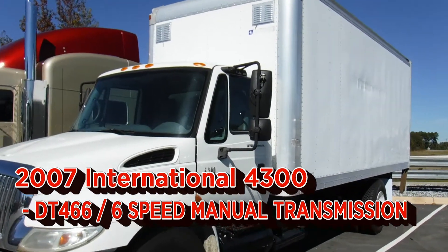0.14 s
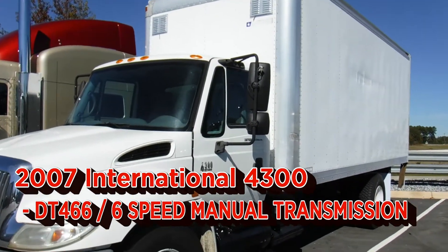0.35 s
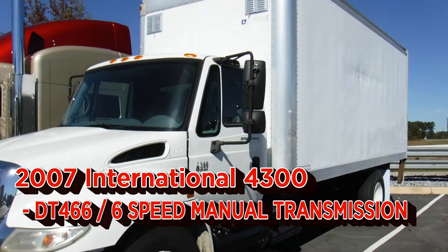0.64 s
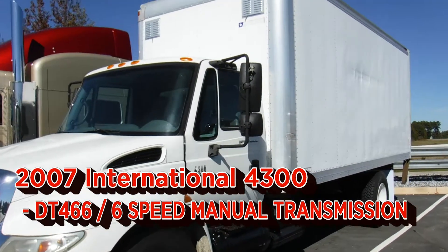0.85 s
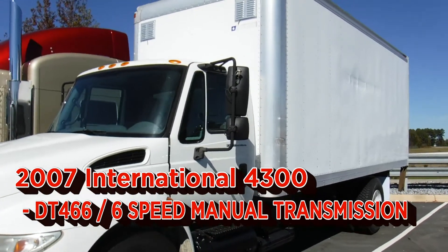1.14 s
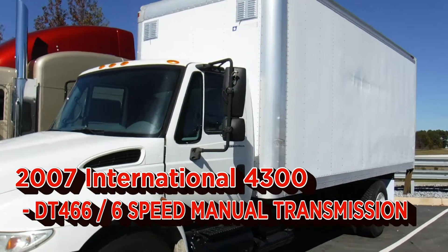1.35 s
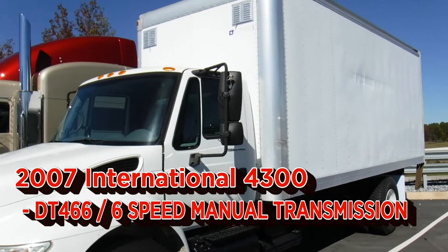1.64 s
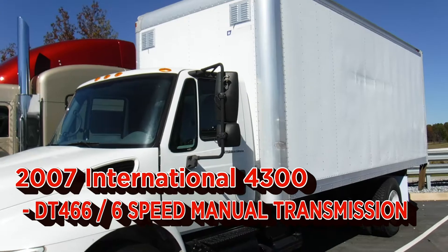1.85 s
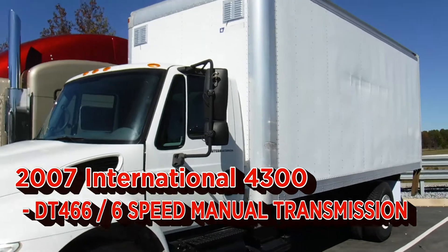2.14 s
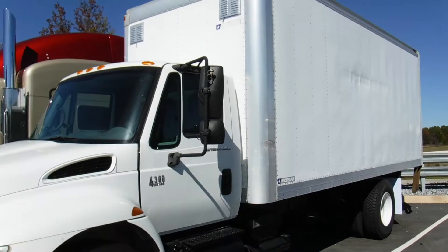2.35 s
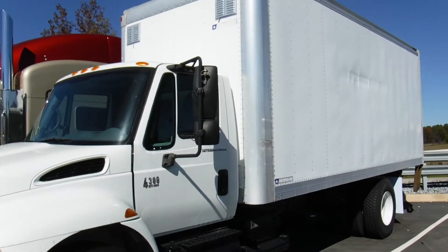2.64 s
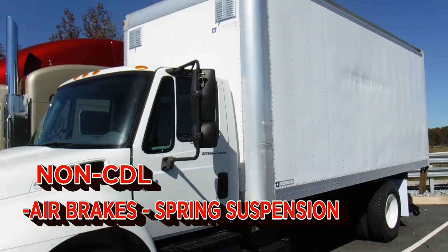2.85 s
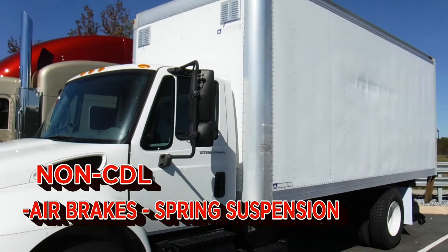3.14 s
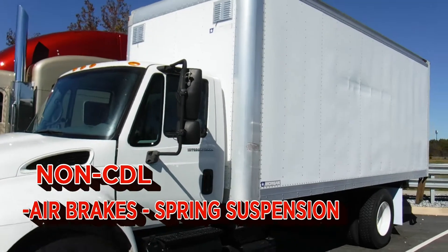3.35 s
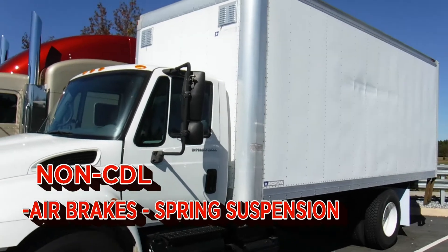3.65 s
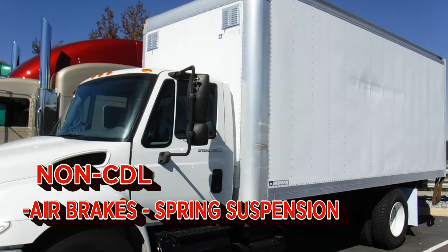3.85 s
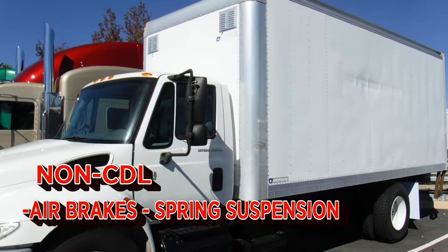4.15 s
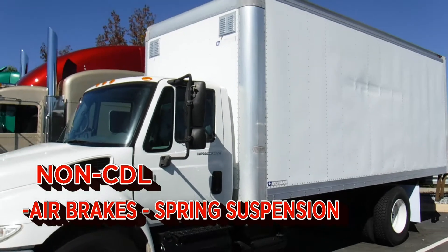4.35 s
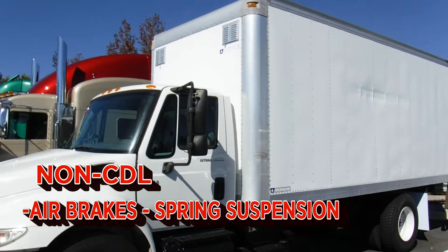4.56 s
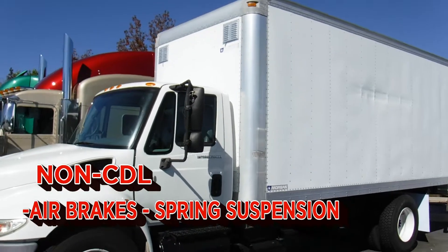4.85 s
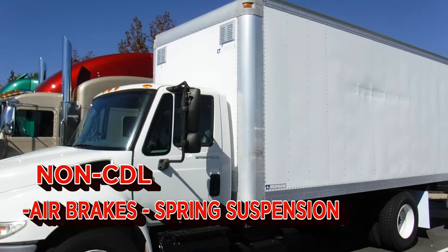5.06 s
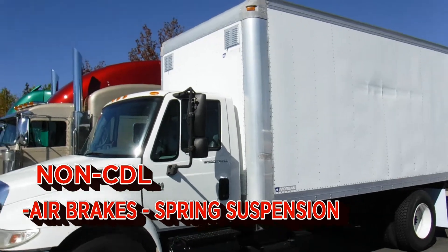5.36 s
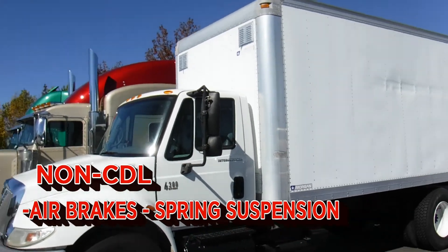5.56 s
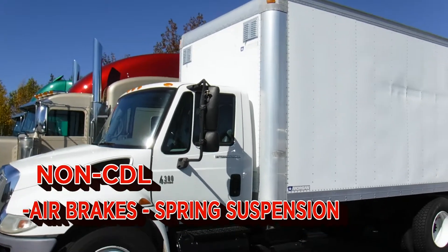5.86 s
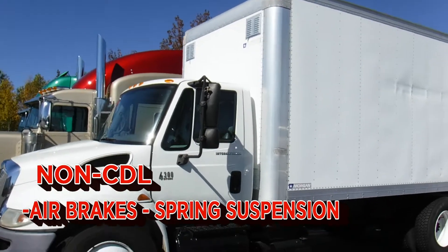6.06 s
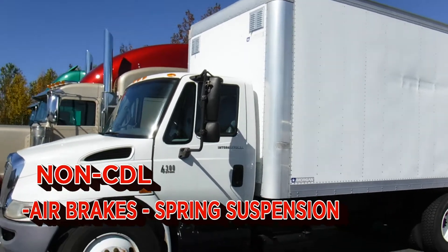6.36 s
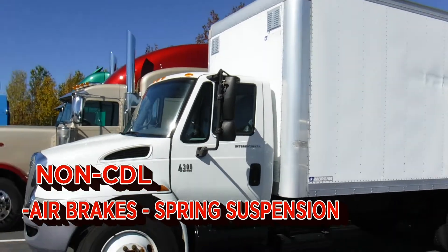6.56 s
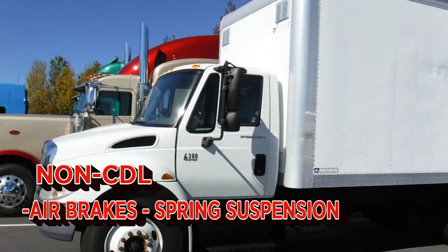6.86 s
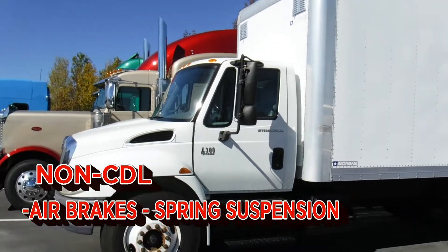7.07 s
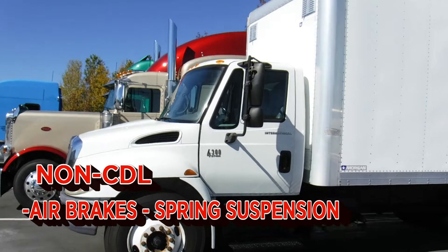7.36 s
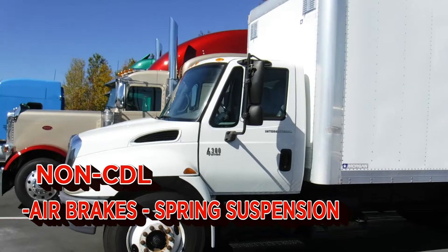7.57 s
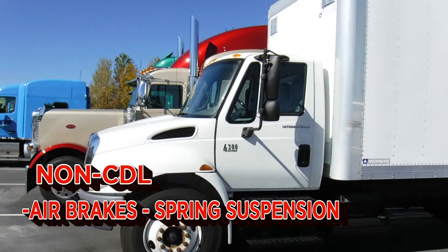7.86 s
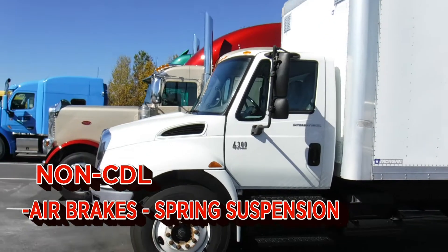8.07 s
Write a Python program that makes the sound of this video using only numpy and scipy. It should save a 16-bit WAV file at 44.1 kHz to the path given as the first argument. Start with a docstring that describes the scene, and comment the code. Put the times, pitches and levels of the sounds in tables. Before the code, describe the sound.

Steady rattling truck diesel idle in an open lot, wind bumping the microphone, interrupted midway by one sharp, overloading blast of released air.

```python
"""A six-cylinder diesel truck idles in an open lot while the microphone is carried from its nose to its side.
From the start each firing excites the block and rattles the injectors, shaped noise ringing in resonances; the
idle speed hunts gently. A belt sings in close sine tones early on, and gusts of filtered noise buffet the
microphone. Halfway through, an air valve dumps its pressure: a loud hiss of turbulent noise, its peaks clipped
flat, fades ever faster and leaves a diffuse echo, while the engine, now fainter, idles on in the wind."""
import sys
import numpy as np
from scipy import signal
from scipy.fft import rfft, irfft
from scipy.io import wavfile
from scipy.ndimage import uniform_filter1d

SR = 44100
rng = np.random.default_rng(int(sys.argv[2]) if len(sys.argv) > 2 else 0)


def waveform_to_disk(signal):
    """Save audio, clipped to [-1, 1], as 16-bit WAV at the path in sys.argv[1]."""
    frames = np.transpose(np.atleast_2d(signal))
    scaled = np.clip(frames, -1, 1) * 32767
    samples = np.round(scaled).astype(np.int16)
    wavfile.write(sys.argv[1], SR, samples)


N = 362061
TIME = np.arange(N) / SR
FREQS = np.maximum(np.arange(N // 2 + 1) * SR / N, 1)  # Hz, kept above zero for the logarithm

# hunting idle speed: time_s, firing_rate_hz
IDLE_SPEED = [(0, 34.85), (.35, 34.8), (1, 35.45), (1.85, 34.53), (2.95, 35.58), (3.5, 34.35),
              (3.95, 34.75), (4.3, 35.85), (4.75, 35.85), (5.25, 34.6), (5.6, 34.45), (6.2, 34.9),
              (6.7, 35.62), (7.6, 34.58), (8.21, 34.95)]
# cylinders in firing order, compared with one another: knock_db, rattle_db
CYLINDER_LEVELS = [(-2, 6.5), (-0.9, 7.5), (-0.1, 7), (0, 8.5), (-0.5, 7), (-0.4, 9.5)]
# broad spectrum of the combustion knock: frequency_hz, level_db
KNOCK_SPECTRUM = [(20, -57), (300, -27), (540, -11.5), (650, -5.5), (800, -2), (1200, 1), (1450, 1.5),
                  (1650, -2), (1850, -4), (2300, -16.5), (3500, -19.5), (7000, -61)]
# broad spectrum of the injector rattle: frequency_hz, level_db
RATTLE_SPECTRUM = [(1200, -12), (2100, -1), (2600, 2), (3100, -1), (3700, 1), (5400, 0), (5800, -0.5),
                   (6500, -10.5), (7200, -10), (8100, -11.5), (8900, -18.5), (11000, -29.5), (15500, -37)]
# broad spectrum of the low drone: frequency_hz, level_db
DRONE_SPECTRUM = [(15, -28), (24, -18), (35, -3.5), (70, -1.5), (115, -1), (160, -3.5), (210, -7),
                  (340, 4.5), (480, -7.5), (800, 7.5), (2000, -55)]
# block and panel resonances heard in front of the truck: centre_hz, width_hz, lift_db
NOSE_RESONANCES = [(115, 25, 6), (202, 60, 4.5), (339, 120, 4), (625, 33, 5), (908, 50, 8), (1080, 99, 2.5),
                   (1520, 360, 1), (2580, 110, 0.5), (4330, 120, -4.5), (4990, 90, -4), (6300, 120, -1),
                   (6800, 190, 9)]
# block and panel resonances heard beside the truck: centre_hz, width_hz, lift_db
SIDE_RESONANCES = [(116, 17, 9.5), (213, 25, 8.5), (460, 50, 0.5), (879, 45, 7), (1063, 30, 6),
                   (1555, 39, 6), (1820, 10, 8.5), (2480, 45, -4), (3525, 18, 9.5), (4170, 94, 2.5),
                   (4960, 37, -15), (6060, 58, 8.5), (6370, 150, 8.5)]
# parts that ring softly at every firing, relative to the rattle: centre_hz, width_hz, level_db
RINGING_PARTS = [(4250, 81, -27), (4780, 300, -17), (6280, 380, -14.5)]
# engine level on the way from nose to side: time_s, level_db
ENGINE_LEVELS = [(0, -26.5), (.8, -25.9), (1.7, -28.1), (2.7, -27.5), (3.9, -28.4), (5.1, -30), (6.4, -30),
                 (7.2, -31.5), (8.21, -31)]
# chattering injector and valve parts, relative to the knock: firing_place, pitch_hz, level_db
CHATTERING_PARTS = [(2, 4900, -15.5), (2, 6450, -18.5), (2, 4230, -19), (3, 6350, -19.5), (3, 4230, -19),
                    (5, 4260, -15.5), (5, 6500, -21.5)]
# firings with a set chatter force in place of a random one: time_s, extra_db
SET_CHATTER = [(.728, 1), (1.063, 6), (1.233, 6), (1.6, 5), (2.133, 8), (2.533, 8), (3.12, 1), (3.81, 2),
               (7.052, 4), (7.946, 3)]
# belt squeals: middle_s, half_length_s, pitch_hz, level_db
BELT_SQUEALS = [(0.343, 0.35, 3413, -40.5), (0.794, 0.047, 3425, -32), (0.973, .07, 3410, -34),
                (1.179, 0.0497, 3426, -32), (2.668, 0.047, 3500, -36.5), (2.8, 0.72, 3400, -40.5)]
# close tones of a squeal: offset_hz from its pitch, level_db
SQUEAL_TONES = [(-113, -1), (0, 0), (111, -15)]
# gusts of wind: middle_s, half_length_s, level_db
WIND_GUSTS = [(.6, .23, -38), (2.55, 0.49, -44.5), (3.25, 0.4, -34), (4.3, 0.25, -42), (4.853, .15, -50),
              (6.823, 0.23, -43.5), (7.95, 0.44, -50)]
# the hardest buffets on the microphone: middle_s, half_length_s, level_db
HARD_BUFFETS = [(.413, .03, -39.5), (0.704, 0.028, -34), (2.847, 0.018, -26), (2.936, .03, -31),
                (2.986, .01, -26), (3.318, 0.0057, -16), (3.348, 0.0084, -22), (3.383, 0.013, -19.5),
                (3.428, 0.015, -21), (3.464, 0.014, -24), (3.685, 0.03, -29), (4.257, 0.0065, -27),
                (4.422, 0.0053, -29), (4.503, 0.0075, -28), (4.788, .008, -34), (5.3, 0.025, -38.5),
                (6.846, 0.0099, -32.5), (6.972, .007, -36.5)]
# broad spectrum of the wind rumble: frequency_hz, level_db
BREEZE_SPECTRUM = [(15, -15), (24, -14), (36, -20), (80, 0), (120, 1), (220, 0), (350, -7), (600, -12),
                   (1500, -55)]
# broad spectrum of eddies and buffets: frequency_hz, level_db
BUFFET_SPECTRUM = [(30, -28), (90, -26), (180, -0.5), (340, -2), (600, -6.5), (1000, -11), (2500, -37),
                   (6000, -56)]
# broad spectrum of the jet at full pressure: frequency_hz, level_db
FULL_JET_SPECTRUM = [(100, -31), (250, -17), (500, -29), (1000, -34), (1500, -15.5), (2200, -15.5),
                     (3000, -12.5), (4200, -0.5), (5700, -1), (6400, 0), (7300, -6.5), (8400, -6),
                     (9500, -11), (12000, -14), (15500, -21)]
# broad spectrum of the jet at falling pressure: frequency_hz, level_db
WEAK_JET_SPECTRUM = [(500, -38), (2000, -12), (2450, -9.5), (2800, -5), (3400, -18), (4300, -10),
                     (5000, -13), (5900, 2), (6800, -8), (8300, -4), (9500, -11.5), (10500, -5.5),
                     (11500, -25), (15500, -25)]
# resonances of the valve's exhaust port: centre_hz, width_hz, lift_db
PORT_RESONANCES = [(2790, 130, 4.5), (3180, 120, 8.5), (4400, 170, -0.5), (5480, 400, 4.5), (6300, 170, 1),
                   (6970, 140, 4.5), (7750, 220, 5.5), (8440, 170, 1), (10130, 300, -5), (11200, 300, 2),
                   (14300, 400, 4)]
# broad spectrum of the hiss returning from the parked trucks: frequency_hz, level_db
ECHO_SPECTRUM = [(500, -21.5), (2300, -17), (2900, 0.5), (3600, -1), (6200, -5), (8000, -20), (11000, -28),
                 (15500, -35)]

FIRST_PHASE = .78  # part of a firing interval already elapsed at the start
KNOCK_RISE_S, KNOCK_RING_S = .0058, .019
BLOCK_DB, GEARS_DB = -25.5, -5  # relative to the knock, before the panels colour all three
RATTLE_DB, DRONE_DB = -.74, -13  # relative to the knock
CHATTER_LAG_S, CHATTER_RISE_S, CHATTER_DECAY_S = .003, .0035, .021
CHATTER_SCATTER_DB, CHATTER_Q = 1.5, 27
CALM_DB = -55  # wind between gusts
EDDY_DB, EDDY_SPREAD_DB = -15, 4.5  # small buffets relative to the wind, and their spread
VALVE_OPENS_S, VALVE_TRAVEL_S = 3.994, .033
FADE_DB_PER_S, FADE_DB_PER_S2 = 24.5, 40
WEAK_AFTER_DB, WEAK_SHARE = 16, .66  # fade at which the weak colour reaches its full share
DULL_FROM_DB, DULL_OVER_DB = 12, 23  # fade at which the top begins to go, further fade until it is gone
TOP_HZ = 15700


def undb(db):
    """Amplitude gain is ten to the power of decibels over twenty."""
    return 10 ** (np.asarray(db) / 20)


def unit(x):
    """Normalization: division by the root mean square gives unit rms."""
    return x / np.sqrt(np.mean(x ** 2))


def curve(rows):
    """Linear interpolation joins points (time_s, value)."""
    rows = np.array(rows)
    return np.interp(TIME, rows[:, 0], rows[:, 1])


def noise():
    """White noise: independent Gaussian samples of equal power at all frequencies."""
    return rng.standard_normal(N)


def walk(corner_hz):
    """Low-passed noise makes a smooth random wander of unit spread."""
    return unit(irfft(rfft(noise()) / (1 + (FREQS / corner_hz) ** 4), N))


def swell(middle_s, half_s, db):
    """Flat-topped envelope: a smooth rise, a short hold and a smooth fall."""
    return undb(db) / np.sqrt(1 + ((TIME - middle_s) / half_s) ** 8)


def colour(x, points, modes=()):
    """Minimum-phase filtering by a broad spectrum with resonances on top; unit rms."""
    hz, db = np.transpose(points)
    db = np.interp(np.log(FREQS), np.log(hz), db)
    for centre, width, lift in modes:
        db = db + lift / (1 + (2 * (FREQS - centre) / width) ** 2)
    # folding the cepstrum onto positive times makes the filter causal
    cepstrum = irfft(np.log(undb(db)), N)
    cepstrum[1:N // 2] *= 2
    cepstrum[N // 2:] = 0
    response = np.exp(rfft(cepstrum))
    return unit(irfft(rfft(x) * response, N))


def ring(x, hz, width_hz):
    """Simple resonance: a second-order peak filter, normalized to unit rms."""
    b, a = signal.iirpeak(hz, hz / width_hz, fs=SR)
    return unit(signal.lfilter(b, a, x))


def ring_twice(x, hz, width_hz):
    """Two equal resonances in cascade give steeper skirts and a rounded onset."""
    return ring(ring(x, hz, width_hz), hz, width_hz)


def reflect(x, decay_s, db):
    """Dense close reflections: convolution with decaying noise adds sound off the chassis and ground."""
    t = np.arange(SR // 10) / SR
    echoes = unit(rng.standard_normal(len(t)) * np.exp(-t / decay_s)) / np.sqrt(len(t))
    return x + undb(db) * signal.fftconvolve(x, echoes)[:N]


def firings():
    """Phase integration: a cylinder fires whenever the accumulated firing rate passes a whole number."""
    phase = FIRST_PHASE + np.cumsum(curve(IDLE_SPEED)) / SR
    return np.interp(np.arange(1, int(phase[-1]) + 1), phase, TIME)


def firing_cylinders(times):
    """Cyclic firing order: the cylinders take their turns one after another."""
    return np.arange(1, len(times) + 1) % len(CYLINDER_LEVELS)


def blows(times, cylinder_db, rise_s, decay_s, scatter_db, alike, jitter_s, ragged_db):
    """Repeated impact excitation: noise bursts at the firings, partly alike from cycle to cycle."""
    t = np.arange(SR // 10) / SR
    shape = (1 - np.exp(-(t / rise_s) ** 2)) * np.exp(-t / decay_s)
    own = rng.standard_normal((len(cylinder_db), len(t)))
    # pressure rise, piston slap and bearing play give each cylinder its own lumps
    lumps = undb(ragged_db * unit(uniform_filter1d(rng.standard_normal(own.shape), size=130)))
    memory = .95  # share of a cylinder's own burst power kept until its next firing
    out = np.zeros(N + SR)
    for start, c in zip(times, firing_cylinders(times)):
        drift, fresh = rng.standard_normal((2, len(t)))
        late, strong = rng.standard_normal(2)
        own[c] = np.sqrt(memory) * own[c] + np.sqrt(1 - memory) * drift
        grain = np.sqrt(alike) * own[c] + np.sqrt(1 - alike) * fresh
        burst = grain * unit(shape * lumps[c])
        i = max(int((start + jitter_s * late) * SR), 0)
        out[i:i + len(t)] += burst * undb(cylinder_db[c] + scatter_db * strong)
    return unit(out[:N])


def block_thumps(times, cylinder_db, hz, width_hz, lag_s):
    """Impulse response: each pressure peak strikes the main bending mode of the block."""
    sizes = undb(cylinder_db[firing_cylinders(times)])
    samples = ((times + lag_s) * SR).astype(int)
    pulses = np.bincount(samples, sizes, N)[:N]
    return ring_twice(pulses, hz, width_hz)


def panels(x, points):
    """Modal radiation: the resonances heard cross-fade on the way from the nose to the side."""
    side = curve([(2.6, .15), (5.2, 1)])
    return (1 - side) * colour(x, points, NOSE_RESONANCES) + side * colour(x, points, SIDE_RESONANCES)


def combustion_knock(times, knock_db):
    """Forced vibration: firing bursts, block thumps and steady gear noise excite the panels."""
    knock = blows(times, knock_db, rise_s=KNOCK_RISE_S, decay_s=KNOCK_RING_S, scatter_db=.2,
                  alike=.98, jitter_s=.0002, ragged_db=0)
    # doubled decibels exaggerate the inequality of the cylinders
    block = block_thumps(times, 2 * knock_db, hz=911, width_hz=170, lag_s=.00296)
    return panels(knock + undb(BLOCK_DB) * block + undb(GEARS_DB) * noise(), KNOCK_SPECTRUM)


def injector_rattle(times, rattle_db):
    """Impact noise: ragged injector bursts over steady noise, with parts ringing at each firing."""
    bursts = blows(times, rattle_db, rise_s=.0042, decay_s=.028, scatter_db=1.5,
                   alike=.39, jitter_s=.0004, ragged_db=-.2)
    ragged = bursts * undb(2 * walk(550))
    rattle = panels(reflect(ragged + noise(), decay_s=.0057, db=-11.5), RATTLE_SPECTRUM)
    for hz, width_hz, db in RINGING_PARTS:
        taps = blows(times, 2 * rattle_db, rise_s=.0019, decay_s=.03, scatter_db=4.5,
                     alike=0, jitter_s=.002, ragged_db=2)
        rattle = rattle + undb(db) * ring_twice(taps, hz, width_hz)
    return rattle


def engine(times):
    """Superposition of combustion knock, injector rattle and a low drone."""
    knock_db, rattle_db = np.transpose(CYLINDER_LEVELS)
    knock = combustion_knock(times, knock_db)
    drone = panels(noise(), DRONE_SPECTRUM)
    rattle = injector_rattle(times, rattle_db)
    return knock + undb(DRONE_DB) * drone + undb(RATTLE_DB) * rattle


def loose_parts(times):
    """Resonant chatter: a noise burst rings each loose part when its own cylinder fires."""
    out = np.zeros(N + SR)
    t = np.arange(SR // 8) / SR
    shape = (1 - np.exp(-t / CHATTER_RISE_S)) * np.exp(-t / CHATTER_DECAY_S)
    force_db = CHATTER_SCATTER_DB * rng.standard_normal(len(times))
    for time_s, extra_db in SET_CHATTER:
        force_db[np.argmin(abs(times - time_s))] = extra_db
    cylinder = firing_cylinders(times)
    for place, hz, db in CHATTERING_PARTS:
        for k in np.flatnonzero(cylinder == place):
            tone = ring_twice(rng.standard_normal(len(t)) * shape, hz, hz / CHATTER_Q)
            i = int((times[k] + CHATTER_LAG_S) * SR)
            out[i:i + len(t)] += tone * undb(db + force_db[k])
    return out[:N]


def belt():
    """Beating of close tones, wandering in pitch and level, makes a thin squeal that comes and goes."""
    swells = np.array([swell(middle, half, db) for middle, half, _, db in BELT_SQUEALS])
    swells = swells + 1e-12  # keeps the weighted mean pitch defined in silence
    pitch_hz = np.array(BELT_SQUEALS)[:, 2] @ swells / swells.sum(axis=0)
    tones = 0
    for offset_hz, db in SQUEAL_TONES:
        turns = np.cumsum(pitch_hz + offset_hz + 9 * walk(54)) / SR
        tones = tones + undb(db + 2.2 * walk(30)) * np.sin(2 * np.pi * turns)
    return unit(tones) * np.linalg.norm(swells, axis=0)


def wind():
    """Turbulent pressure: gusts flutter and rumble on the microphone and shed brighter, ragged buffets."""
    strength = undb(CALM_DB) + sum(swell(*gust) for gust in WIND_GUSTS)
    flutter = undb(3.5 * walk(54))
    breeze = colour(noise() * flutter, BREEZE_SPECTRUM) * strength
    eddies = strength * undb(EDDY_DB + EDDY_SPREAD_DB * walk(49))
    push = eddies + sum(swell(*buffet) for buffet in HARD_BUFFETS)
    raggedness = undb(4 * walk(220))
    return breeze + push * colour(noise() * raggedness, BUFFET_SPECTRUM)


def air_blast():
    """Jet noise: turbulence dulls as pressure drops, combed under the chassis and echoed across the lot."""
    opening = np.clip((TIME - VALVE_OPENS_S) / VALVE_TRAVEL_S, 0, 1)
    age_s = np.maximum(TIME - VALVE_OPENS_S - VALVE_TRAVEL_S, 0)
    # the fade quickens as the pressure runs out
    fade_db = FADE_DB_PER_S * age_s + FADE_DB_PER_S2 * age_s ** 2
    flow = opening ** 3 * undb(-fade_db)

    source = reflect(noise(), decay_s=.03, db=-10)
    full_jet = colour(source, FULL_JET_SPECTRUM, PORT_RESONANCES)
    weak_jet = colour(source, WEAK_JET_SPECTRUM, PORT_RESONANCES)
    spent = WEAK_SHARE * np.minimum(fade_db / WEAK_AFTER_DB, 1)
    jet = (1 - spent) * full_jet + spent * weak_jet

    # the last of the air leaves too slowly to make any top
    dribble = np.clip((fade_db - DULL_FROM_DB) / DULL_OVER_DB, 0, 1)
    dull_jet = signal.sosfiltfilt(signal.butter(4, 10500, fs=SR, output="sos"), jet)
    jet = jet + dribble * (dull_jet - jet)

    # the energy of the diffuse echo builds up while the jet blows and outlasts it
    hold = np.exp(-1 / (.13 * SR))  # energy decay time .13 s
    lingering = np.sqrt(signal.lfilter([1 - hold], [1, -hold], flow ** 2))
    echo = lingering * colour(noise(), ECHO_SPECTRUM)
    return jet * flow * undb(.42 * walk(50)) + undb(-11.5) * echo


def scene():
    """Linear superposition at one microphone, the same on both channels."""
    times = firings()
    truck = (engine(times) + loose_parts(times)) * undb(curve(ENGINE_LEVELS))
    return np.tile(truck + belt() + wind() + air_blast(), (2, 1))


def record(dry):
    """Amplitude limiting: the peaks of the blast are clipped flat, and a low-pass then ends the treble at the
    recorder's cut-off."""
    clipped = np.clip(dry, -.96, .96)
    low_pass = signal.ellip(8, .05, 60, TOP_HZ, fs=SR, output="sos")
    return signal.sosfiltfilt(low_pass, clipped)


dry = scene()
out = record(dry)
waveform_to_disk(out)
```